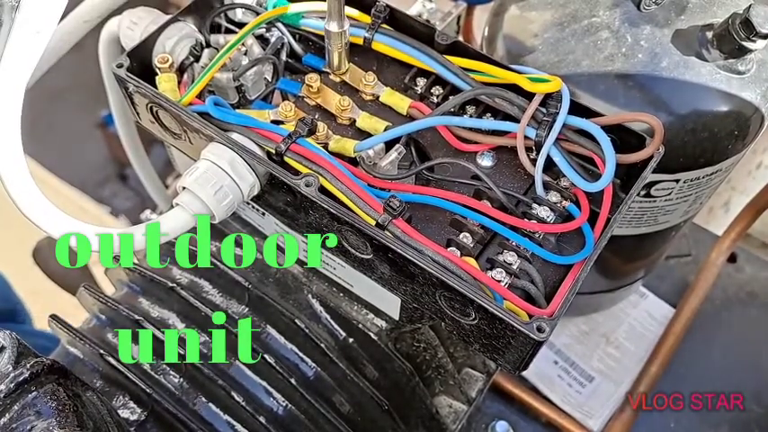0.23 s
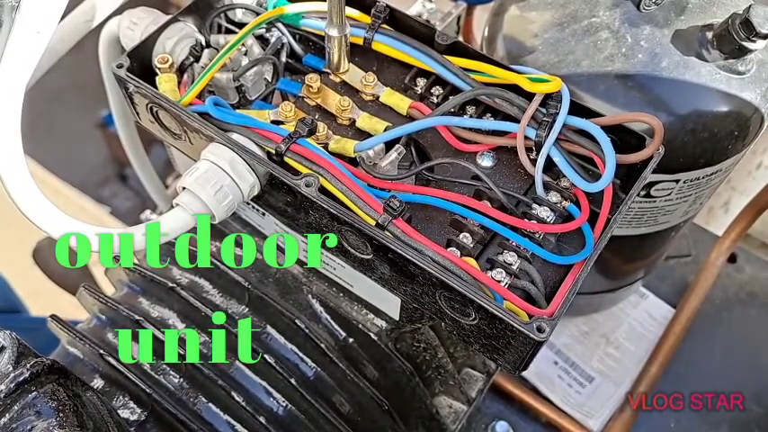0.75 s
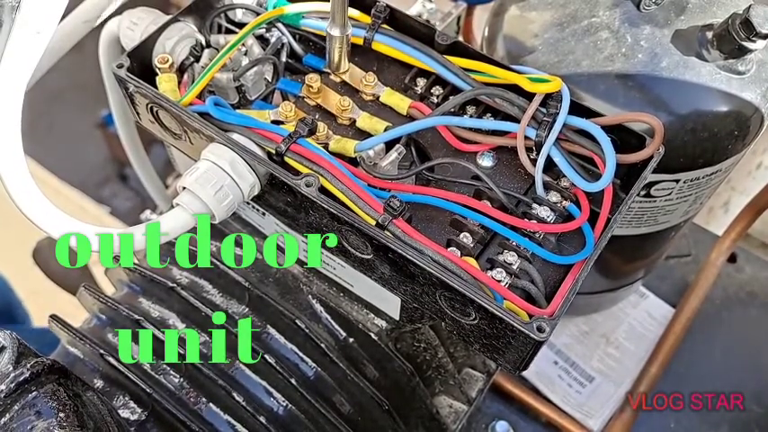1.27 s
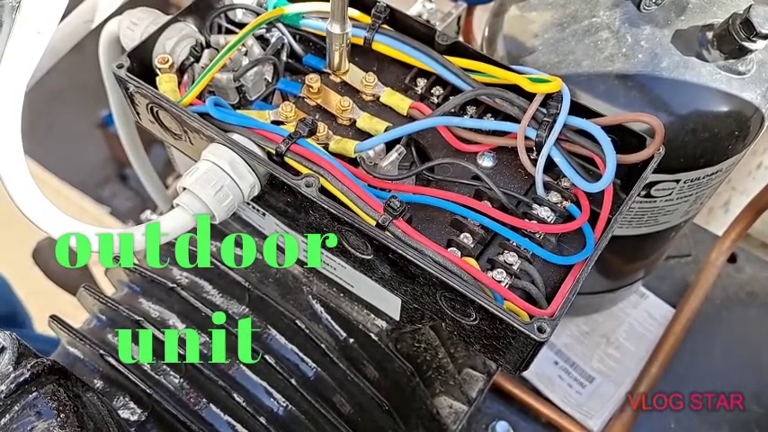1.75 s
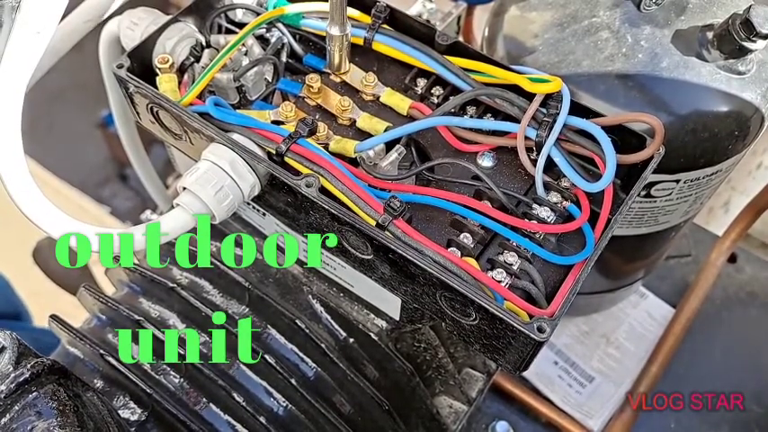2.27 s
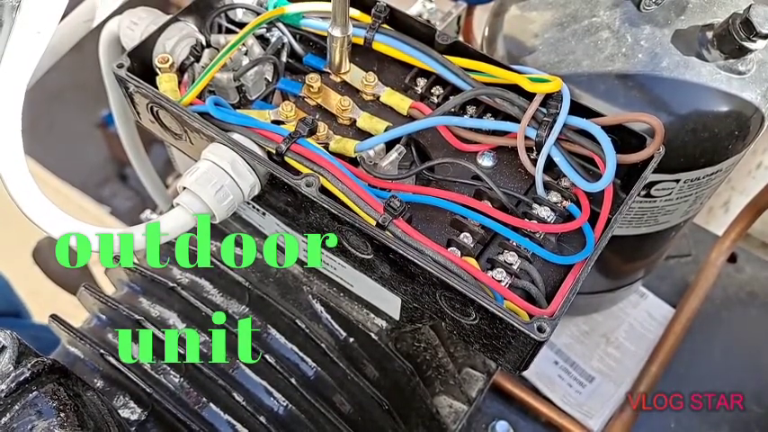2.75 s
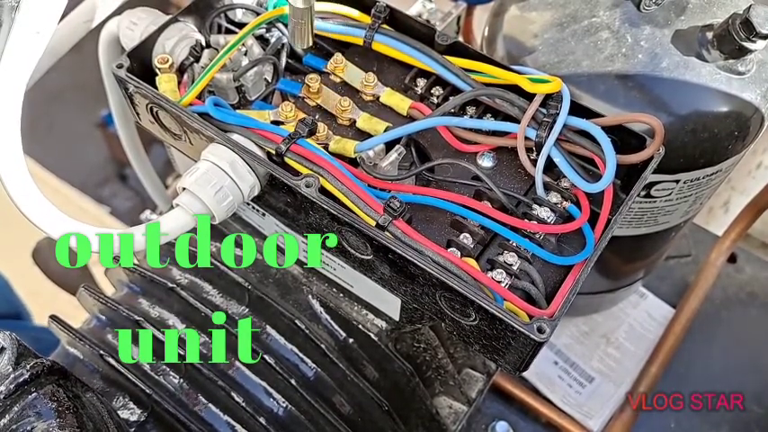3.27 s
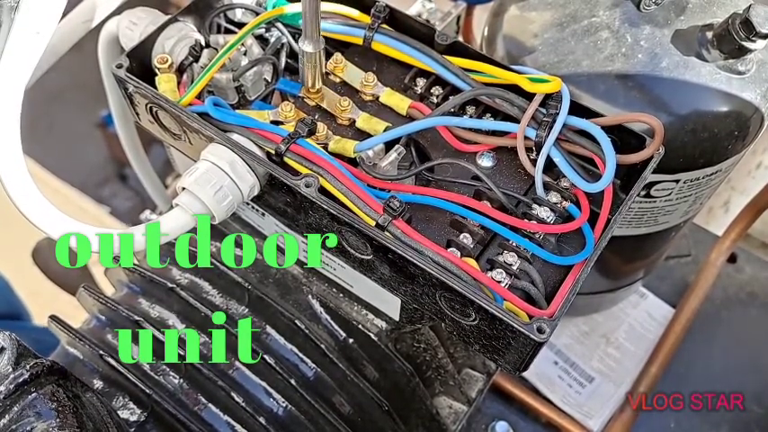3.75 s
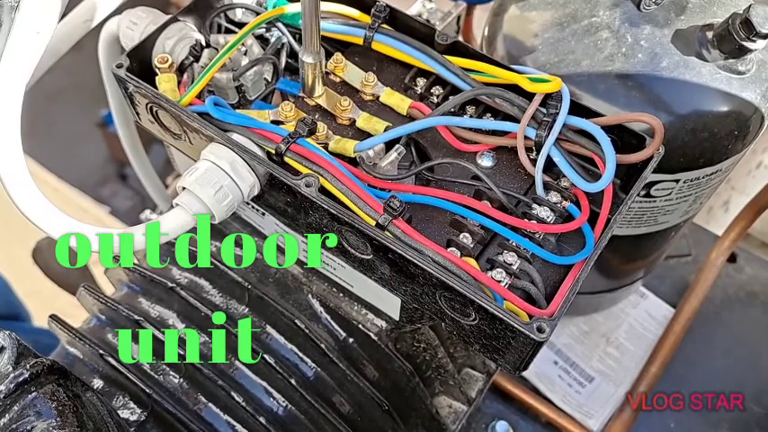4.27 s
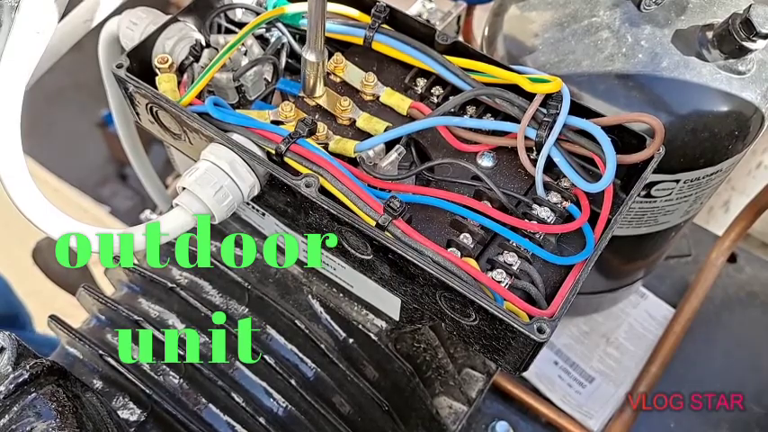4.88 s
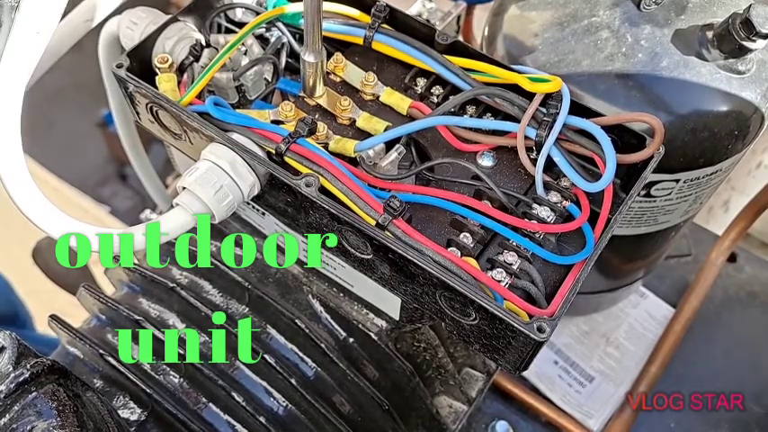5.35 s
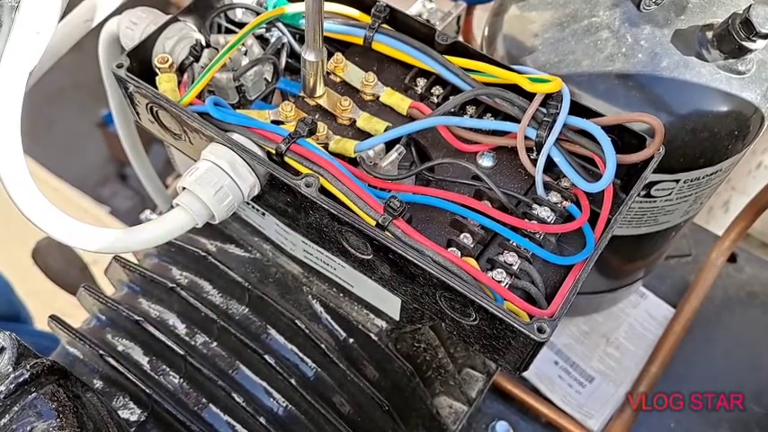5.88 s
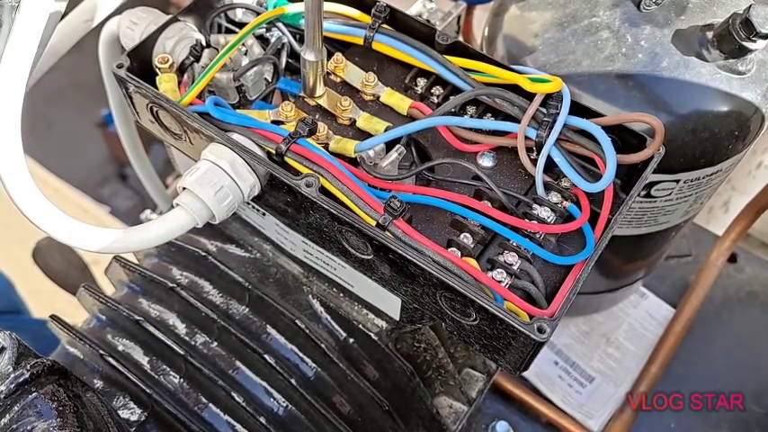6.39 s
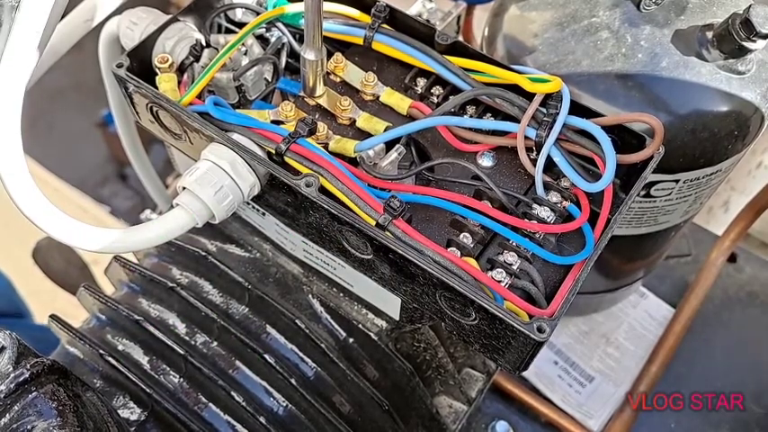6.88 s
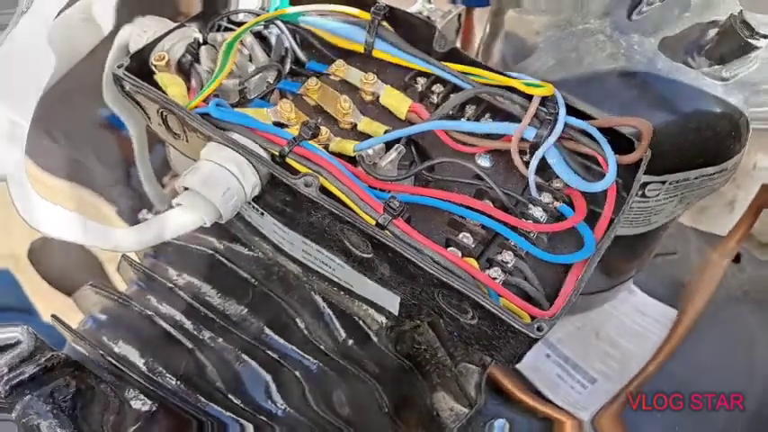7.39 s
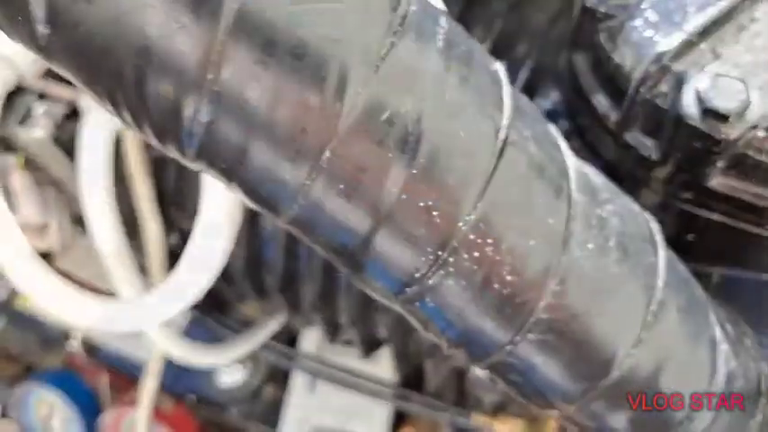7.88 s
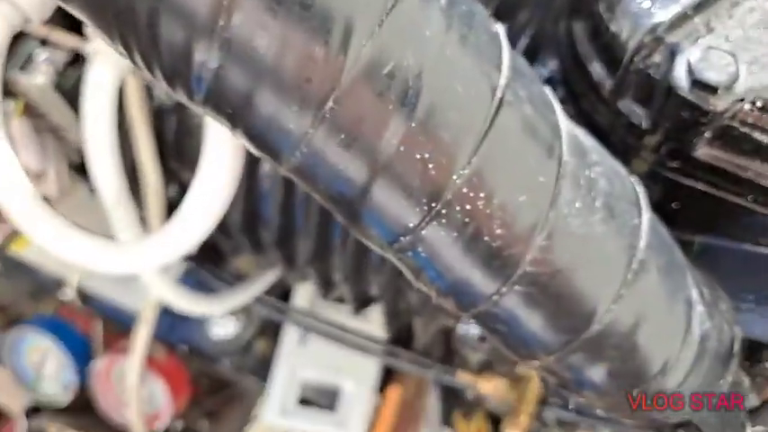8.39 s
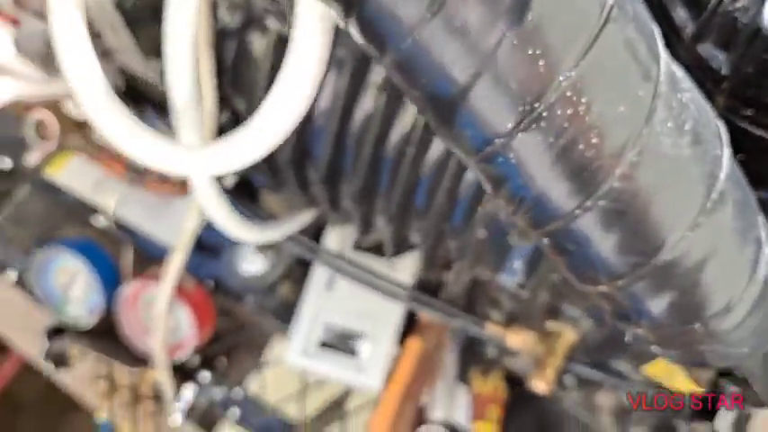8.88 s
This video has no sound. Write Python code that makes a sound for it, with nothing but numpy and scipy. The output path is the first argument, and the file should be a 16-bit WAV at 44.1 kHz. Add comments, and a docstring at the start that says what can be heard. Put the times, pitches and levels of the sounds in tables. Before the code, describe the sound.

Close stereo pickup of a running refrigeration compressor in a workshop: steady rushing air, low hum and fast piston rattle, slightly swelling, with soft casing throbs. Faint tool ticks come early, then sharper brass clicks and a hollow bump midway. The sound stops abruptly for about a second, then resumes from beside a pipe with a heavier, steadier hum.

```python
"""A steady rush of cooling air is heard first, over the hum and rattle of an open refrigeration compressor.
Filtered noise gives the air, multiples of the shaft and mains rates the hum, and repeated knocks the pistons.
The casing throbs at times; a tool clicks on brass terminals (noise bursts and modes); a hollow part is bumped.
The sound cuts out for a second and returns from a second spot, beside a pipe, where the hum is heavier."""
import sys
import numpy as np
from scipy import signal
from scipy.fft import rfft, irfft, next_fast_len
from scipy.io import wavfile
from scipy.ndimage import uniform_filter1d, map_coordinates

SR = 44100
rng = np.random.default_rng(int(sys.argv[2]) if len(sys.argv) > 2 else 0)


def wav_record(signal):
    """Record a signal, one row per channel, as 16-bit PCM in the file named by sys.argv[1]."""
    frames = np.transpose(np.atleast_2d(signal))
    bounded = np.clip(frames, -1, 1)
    # unit amplitude maps onto the largest positive 16-bit level
    quanta = np.round(bounded * 32767).astype(np.int16)
    wavfile.write(sys.argv[1], SR, quanta)


N = 403074  # samples

CRANK_HZ, MOTOR_HZ, MAINS_HZ = 17.2, 58.33, 60.05
TOP_HZ = 15900  # band limit
STOP_S, RESUME_S = 7.091, 8.08  # the silence between the two spots
PORT_LAG = 20  # samples; basis of the delays between the two microphones
BODY_DB, HISS_DB = -26.5, -44  # air at the terminal box, at the mean loudness
BODY_GROWS = 1.02  # dB of body, hum and knocks per dB of loudness
PUFF_S = 0.038  # 1/e half-width of a puff
THROB_S = 0.018  # time a throb takes to swell
STROKE_CHANGE = 0.6  # amplitude share of a knock that is new on every turn

# Overall loudness at the terminal box; only departures from its mean act: t/s, level/dB
LOUDNESS = [(0.0, -50), (0.68, -48.5), (1.21, -45.5), (1.72, -45.5), (1.86, -47), (2.88, -48),
            (6.14, -45.5), (6.8, -46.5)]
# Brief dip of body, rumble, hum and knocks; end values hold outside it: t/s, level/dB
BRIEF_DIP = [(6.748, -1), (6.755, -3), (6.78, -8), (6.795, 0)]
# Air and casing noise spectrum at each spot: f/Hz, mid level/dB, side level/dB (relative)
BOX_AIR_SPECTRUM = [(24.6, -22.5, -22), (57, -6, -13.5), (128, -1, -8.5), (208.3, -7.5, -13.5),
                    (254, 2, -9), (310, -5, -10), (401.6, 1, -12), (524, -4.5, -9.5), (650, -10.5, -8.5),
                    (1030, -16.5, -20), (1780, -26.5, -24), (2360, -22.5, -26.5), (3500, -33, -32.5),
                    (7350, -41.5, -41.5), (8340, -46, -44.5), (12600, -43, -43), (14150, -45.5, -44)]
PIPE_AIR_SPECTRUM = [(25, -38, -43), (60, -11, -26), (132, -3, -39), (198, -9, -13), (257, 1, -3.5),
                     (312, -10.5, -17), (400, -11, -1.5), (642, -14, -30), (780, -23.5, -25),
                     (1210, -27, -23), (1770, -28, -32.5), (2390, -30, -35), (3980, -37, -39),
                     (8850, -45.5, -48.5), (15000, -44.5, -45.5)]
# Low rumble of the draught as it grows: t/s, level/dB
DRAUGHT_LEVEL = [(0, -40.5), (1.7, -36.5), (2.2, -39.5), (4.5, -37), (5.2, -32), (7.0, -30.5)]
# Single puffs of the draught: t/s, level above the rumble/dB
DRAUGHT_PUFFS = [(1.72, 5), (2.43, 11), (5.46, 6), (6.58, 9)]
# Harmonics of motor, crank and mains: order (rounded when used), box mid level/dB, box side level/dB,
# pipe mid level/dB, pipe side level/dB
MOTOR_HARMONICS = [(1, -59.5, -63, -38.5, -76), (2, -37.5, -45.5, -28.5, -63), (3, -38, -63, -28.5, -45),
                   (5, -43.5, -62.5, -36, -45), (6, -37.5, -55, -47, -51), (8, -64.5, -54.5, -43, -50.5)]
CRANK_HARMONICS = [(15, -58, -74, -31.5, -59), (16, -55.5, -68, -52, -39), (21, -51, -66, -39, -59),
                   (24, -36.5, -31.5, -25, -36), (31, -41.5, -59.5, -56, -55), (32, -43, -53, -41, -55.5),
                   (33, -40, -50.5, -41.5, -58), (36, -41.5, -37.5, -44, -47), (48, -35, -46.5, -45, -34),
                   (55, -62, -58.5, -47, -56.5), (57, -73, -71, -53, -58), (60, -55.5, -40, -62, -59),
                   (64.8, -57.5, -57, -58, -60), (71.5, -49.5, -51.5, -49.5, -40)]
MAINS_HARMONICS = [(8, -43, -49, -57, -55.5)]
# Knocks within one crank turn at each spot: share of the turn, f/Hz, relative level/dB, unevenness/dB
BOX_KNOCKS = [(.02, 600, -10, 2.5), (.17, 1100, -12, 2), (.28, 750, -15, 2), (.39, 650, -13.5, 2),
              (.48, 420, -10, 2.5), (.785, 540, -5, 3), (.8, 880, -7.5, 2), (.858, 1430, -6, 2),
              (.98, 1020, -12.5, 2)]
PIPE_KNOCKS = [(.11, 1000, -17, 2), (.59, 260, -4, 1.5), (.61, 620, -10, 2), (.64, 1250, -5, 2)]
# Casing modes rung by the pistons: f/Hz, relative level/dB, t60/s
CASING_MODES = [(273, -10.5, 0.01), (412, -1.5, 0.036), (490, -3.5, 0.012), (583, -4.5, 0.0099),
                (721, -12, 0.014), (832, 0.5, 0.051), (860, -1.5, 0.027), (1060, -22.5, 0.0083),
                (1287, -3, 0.013), (1393, -9, 0.025)]
# Heavier throbs of the casing: t/s, f/Hz, level/dB
CASING_THROBS = [(.882, 407, -23), (1.131, 400, -24), (1.466, 412, -20.5), (1.763, 412, -18.5),
                 (2.411, 122.4, -25), (2.628, 122, -25), (2.932, 122, -25), (3.28, 107, -26),
                 (3.374, 404, -22), (4.082, 388, -39), (4.68, 408, -21.5), (4.799, 389, -22.5),
                 (4.906, 252, -22), (4.972, 412, -23), (5.057, 253, -22), (5.278, 119, -19),
                 (5.355, 120.5, -22), (5.651, 120, -22.5), (5.666, 400, -25), (5.89, 131, -20),
                 (5.969, 409, -22.5), (6.136, 124, -20), (6.165, 255, -19), (6.331, 261, -21),
                 (6.341, 403, -25.5), (6.574, 124, -25.5), (6.67, 250, -23), (6.711, 410, -24),
                 (6.717, 120, -22.5), (6.828, 247, -19.5)]
# Tool contacts: t/s, relative snap level/dB, relative ring level/dB, hardness as ring tilt/(dB per octave),
# ping f/Hz
TOOL_CLICKS = [(1.6737, -36, -59, 5.5, 11200), (1.711, -44, -59, 5.5, 12500), (1.786, -43, -58, 5, 12900),
               (3.2512, -41, -33.5, 9, 12390), (3.2553, -34, -15, 1.5, 12400),
               (3.259, -34.5, -19, 1, 12400), (3.267, -38, -11.5, -1.5, 12000),
               (3.706, -42, -35, 10, 12000), (3.8686, -24.5, -24.5, 4.5, 13770)]
# Brass terminal modes: f/Hz, relative level/dB, t60/s
TERMINAL_MODES = [(1652, -4.5, 0.026), (1782, -5, .022), (1955, -6.5, 0.018), (2220, -4, 0.014),
                  (2280, 3.5, 0.022), (2930, -6.5, 0.016), (3400, -3.5, 0.018), (3870, -7, .014),
                  (4410, -6.5, 0.016), (5600, -13.5, .014), (7750, -13.5, .014)]
# Spectra of a metal contact, the bright snap and the dull crack: f/Hz, relative level/dB
SNAP_SPECTRUM = [(1000, -28), (2000, -11), (4500, -8.5), (6500, -10), (10500, -6), (13500, -6.5),
                 (16000, -6.5)]
CRACK_SPECTRUM = [(1100, -31), (1650, 1), (2300, 0.5), (3000, -12), (4200, -11), (7500, -13), (16000, -42)]
# Contacts of the hollow part: t/s, relative level/dB, f/Hz that this contact rings most
HOLLOW_BUMPS = [(3.5715, -18, 452), (3.576, -18.5, 330), (3.582, -12.5, 640), (3.596, -20.5, 1750),
                (3.6, -16, 640), (3.6075, -17.5, 462)]
# Modes of the hollow part: f/Hz, relative level/dB, t60/s
HOLLOW_MODES = [(330, 0, 0.082), (454, 1, 0.08), (624, -1, 0.1), (693, -2.5, 0.06), (980, -1.5, 0.034),
                (1730, -4.5, 0.037)]
# Spectrum of its dense, ragged ring: f/Hz, relative level/dB
CHATTER_SPECTRUM = [(150, -24), (300, -3), (650, -2), (1100, -14), (1800, -14.5), (3000, -29), (10000, -56)]


def amp(db):
    """Level law: decibels to amplitude ratio."""
    return 10 ** (np.asarray(db) / 20)


def unit(x):
    """Normalization: scale to rms 1."""
    return x / np.sqrt(np.mean(x ** 2) + 1e-20)


def curves(rows):
    """Linear interpolation in time: one curve for each column after t."""
    s, *columns = np.transpose(rows)
    return [np.interp(np.arange(N) / SR, s, column) for column in columns]


def wobble(rate):
    """Band-limited random modulation: a smooth curve with rate knots per second."""
    knots = rng.standard_normal(int(N * rate / SR) + 4)
    return map_coordinates(knots, [np.arange(N) * rate / SR])


def stereo(mid, side):
    """Sum and difference: mid and side to left and right."""
    return np.array([mid + side, mid - side])


def add(track, s, sound):
    """Superposition: mix a sound into a track at time s."""
    start = max(round(s * SR), 0)
    part = track[..., start:][..., :sound.shape[-1]]
    part += sound[..., :part.shape[-1]]


def colour(white, points):
    """Spectral shaping: give noise a piecewise spectrum over log frequency and rms 1."""
    f, db = np.transpose(points)
    m = next_fast_len(len(white))
    log_f = np.log(np.fft.rfftfreq(m, 1 / SR) + 1)
    gain = amp(np.interp(log_f, np.log(f), db, left=db[0] - 8.5))
    return unit(irfft(rfft(white, m) * gain, m)[:len(white)])


def patchy(x, depth_db):
    """Time-frequency modulation: small patches of noise swell and fade, less so in the far hiss."""
    hz, _, z = signal.stft(x, SR, nperseg=512)
    field = uniform_filter1d(rng.standard_normal(z.shape[1:]), size=3, axis=0)
    field = unit(uniform_filter1d(field, size=5, axis=1))
    depth = depth_db * np.interp(hz, [3000, 6000], [1, .3])[:, None]
    return signal.istft(z * amp(depth * field), SR, nperseg=512)[1][:, :N]


def side_share(table):
    """Power summation over bands: side rms over mid rms of a spectrum."""
    width = np.gradient(table[:, 0])
    mid_power = width @ amp(table[:, 1]) ** 2
    side_power = width @ amp(table[:, 2]) ** 2
    return np.sqrt(side_power / mid_power)


def draught_db():
    """Slow level growth: rumble of the draught with short Gaussian puffs added in decibels."""
    t = np.arange(N) / SR
    puffs = sum(db * np.exp(-((t - s) / PUFF_S) ** 2) for s, db in DRAUGHT_PUFFS)
    return curves(DRAUGHT_LEVEL)[0] + puffs


def air(spectrum, lag, rumble_db, body_db, hiss_db, churn_db, flutter_db, direct, patchy_db):
    """Broadband flow noise: the low end churns in the draught and the middle flutters."""
    table = np.array(spectrum)
    near, room = patchy(rng.standard_normal((2, N)), depth_db=patchy_db)
    # the direct sound crosses the two microphones one after the other
    across = direct * (np.roll(near, lag) - np.roll(near, -lag)) + room
    mid = colour(near, table[:, [0, 1]])
    side = side_share(table) * colour(across, table[:, [0, 2]])
    rush = unit(stereo(mid, side))

    def below(hz):
        """Zero-phase low-pass filtering of the rush."""
        return signal.sosfiltfilt(signal.butter(2, hz, fs=SR, output="sos"), rush)

    bass, middle, lower = below(210), below(600), below(3600)
    rumble = amp(rumble_db + churn_db * wobble(22)) * unit(bass)
    flutter = amp(flutter_db * (0.58 * wobble(25) + wobble(80)))
    body = amp(body_db) * unit((middle - bass) * flutter + lower - middle)
    hiss = amp(hiss_db) * unit(rush - lower)
    return rumble + body + hiss


def tones(orders, hz, at_pipe, drift, flutter_db):
    """Harmonic series: multiples of one slightly unsteady rate; the nearer microphone leads in phase."""
    phase = 2 * np.pi * hz * (np.arange(N) / SR + drift * wobble(1.1))  # drift in seconds
    lead = 1 if at_pipe else -1
    out = np.zeros((2, N))
    for order, *levels in orders:
        mid_db, side_db = levels[2:] if at_pipe else levels[:2]
        angle = round(order) * phase + rng.uniform(0, 2 * np.pi)
        tone = stereo(amp(mid_db) * np.sin(angle), lead * amp(side_db) * np.cos(angle))
        out += amp(flutter_db * wobble(11)) * tone
    return out


def hum(at_pipe):
    """Periodic forcing: motor imbalance, pumping pulsation (steadier at the pipe) and magnetic whine."""
    motor = tones(MOTOR_HARMONICS, MOTOR_HZ, at_pipe, drift=0.00033, flutter_db=2.5)
    pump_flutter_db = 0.8 if at_pipe else 1.4
    pump = tones(CRANK_HARMONICS, CRANK_HZ, at_pipe, drift=.00005, flutter_db=pump_flutter_db)
    whine = tones(MAINS_HARMONICS, MAINS_HZ, at_pipe, drift=.00005, flutter_db=1.0)
    return motor + pump + whine


def thud(hz, cycles):
    """Heavily damped oscillation: a dull knock that peaks after the given cycles and soon fades."""
    t = np.arange(SR // 8) / SR
    u = t * hz / cycles
    return (u * np.exp(1 - u)) ** 2 * np.sin(2 * np.pi * (hz * t + rng.random()))


def ring(modes, rise):
    """Modal decay: struck modes, each at a new strength and phase; a soft contact swells over rise seconds."""
    t = np.arange(SR // 8) / SR
    total = 0
    for hz, db, t60 in modes:
        decay = amp(db + rng.normal(0, 2) - 60 * t / t60)
        total = total + decay * np.sin(2 * np.pi * (hz * t + rng.random()))
    return (1 - np.exp(-(t / rise) ** 2)) * total


def at_ports(strike, lag, diffuse):
    """Arrival-time difference: left hears direct sound lag samples late; each side has its own echoes."""
    direct, left, right = [strike() for _ in range(3)]
    arrivals = np.array([np.roll(direct, max(lag, 0)), np.roll(direct, max(-lag, 0))])
    return arrivals + diffuse * np.array([left, right])


def knocks(stroke, lag, thud_db, casing_db, diffuse):
    """Near-periodic impact: knocks much alike on every turn split the rattle into lines; colour varies."""
    out = np.zeros((2, N))
    turns = np.arange(int(N / SR * CRANK_HZ) + 1)

    def strike(pitch):
        """Impact excitation: a thud and the casing modes it rings."""
        return amp(thud_db) * thud(pitch, cycles=1.9) + amp(casing_db) * ring(CASING_MODES, rise=.0015)

    for share, hz, db, uneven_db in stroke:
        usual = np.sqrt(1 - STROKE_CHANGE ** 2) * at_ports(lambda: strike(hz), lag, diffuse)
        others = np.array([at_ports(lambda: strike(hz * 2 ** octaves), lag, diffuse)
                           for octaves in rng.normal(0, .2, size=4)])
        draws = rng.standard_normal((len(turns), 2 + len(others)))
        for turn, (size, late, *mix) in zip(turns, draws):
            # a new blend of the other strikes on every turn
            sound = usual + STROKE_CHANGE * np.tensordot(mix / np.linalg.norm(mix), others, 1)
            when = (turn + share) / CRANK_HZ + .00005 * uneven_db * late
            add(out, when, amp(db + uneven_db * size) * sound)
    return out


def throbs():
    """Transient oscillation: single slower, heavier throbs of the casing stand out of the rattle."""
    out = np.zeros((2, N))
    for s, hz, db in CASING_THROBS:
        throb = at_ports(lambda: thud(hz, cycles=hz * THROB_S), PORT_LAG, diffuse=.2)
        add(out, s, amp(db) * throb)
    return out


def compressor():
    """Superposition of sources: the machine heard from the terminal box, then from the pipe."""
    loudness_db, = curves(LOUDNESS)
    dip_db, = curves(BRIEF_DIP)
    swell_db = loudness_db - loudness_db.mean()
    drive_db = BODY_GROWS * swell_db + dip_db
    box = air(BOX_AIR_SPECTRUM, PORT_LAG, rumble_db=draught_db() + dip_db, body_db=BODY_DB + drive_db,
              hiss_db=HISS_DB + swell_db, churn_db=2.0, flutter_db=0.77, direct=0.18, patchy_db=2.0)
    box_knocks = knocks(BOX_KNOCKS, lag=PORT_LAG // 2, thud_db=-20.5, casing_db=-28, diffuse=.3)
    box += amp(drive_db) * (hum(at_pipe=False) + box_knocks)
    box += throbs()
    pipe = air(PIPE_AIR_SPECTRUM, -PORT_LAG, rumble_db=-30, body_db=-24.0, hiss_db=-41.0,
               churn_db=-0.5, flutter_db=-1.0, direct=0.34, patchy_db=1.4)
    pipe += hum(at_pipe=True)
    pipe += knocks(PIPE_KNOCKS, lag=-PORT_LAG // 4, thud_db=-24, casing_db=-31, diffuse=.3)
    pipe *= amp([[1.1], [-1.1]])  # raises left, lowers right
    return np.where(np.arange(N) < STOP_S * SR, box, pipe)


def burst(points, t60, rise):
    """Dense modal decay: shaped noise swells with time constant rise and dies away."""
    t = np.arange(SR // 8) / SR
    return colour(rng.standard_normal(len(t)), points) * amp(-60 * t / t60) * (1 - np.exp(-t / rise))


def tool_clicks():
    """Hard contact: the tool snaps on the brass terminals, each contact with its own high ping."""
    out = np.zeros((2, N))
    for s, snap_db, ring_db, tilt_db, ping_hz in TOOL_CLICKS:
        ping = [(ping_hz * .82, -35), (ping_hz, 0), (ping_hz * 1.2, -35)]
        snap = np.array([burst(SNAP_SPECTRUM, t60=0.021, rise=0.00023) + 0.8 * burst(ping, t60=.028, rise=.0002)
                         for _ in range(2)])  # independent left and right
        modes = [(hz, db + tilt_db * np.log2(hz / 2000), t60) for hz, db, t60 in TERMINAL_MODES]
        brass = at_ports(lambda: ring(modes, rise=0.00022), lag=0, diffuse=.7)
        crack = 0.98 * burst(CRACK_SPECTRUM, t60=0.046, rise=0.00018)
        add(out, s, amp(snap_db + 6.5) * snap + amp(ring_db - 8.5) * (brass + crack))
    return out


def hollow_bumps():
    """Selective modal excitation: each contact favours the hollow part's modes near one pitch, with chatter."""
    out = np.zeros((2, N))
    for s, level_db, main_hz in HOLLOW_BUMPS:
        modes = [(hz, db - min(30 * abs(np.log2(hz / main_hz)), 12), t60) for hz, db, t60 in HOLLOW_MODES]
        shell = at_ports(lambda: ring(modes, rise=0.0032), lag=0, diffuse=0.2)
        chatter = burst(CHATTER_SPECTRUM, t60=0.165, rise=.003)
        add(out, s, amp(level_db + 3.5) * shell + amp(level_db - 13.5) * chatter)
    return out


def scene():
    """Superposition: machine, tool and hollow part together."""
    return compressor() + tool_clicks() + hollow_bumps()


def record(dry):
    """Gating and band limitation: a second of silence between the spots, and a steep low-pass."""
    t = np.arange(N) / SR
    fade_in = np.clip(0.6 + (t - RESUME_S) / 0.044, 0, 1)
    heard = (t < STOP_S) + (t >= RESUME_S) * fade_in
    m = next_fast_len(N + 8192)
    low_pass = 1 / (1 + (np.fft.rfftfreq(m, 1 / SR) / TOP_HZ) ** 300)
    return irfft(rfft(dry * heard, m) * low_pass, m)[:, :N]


dry = scene()
out = record(dry)
wav_record(out)
```